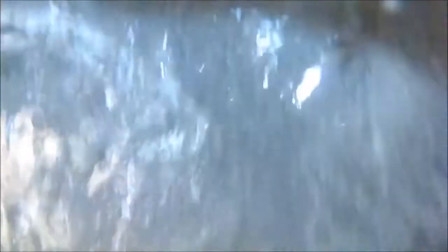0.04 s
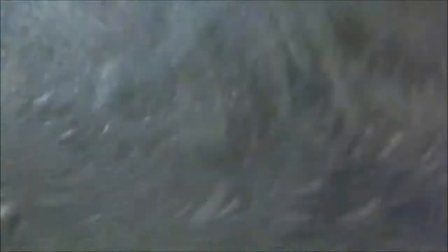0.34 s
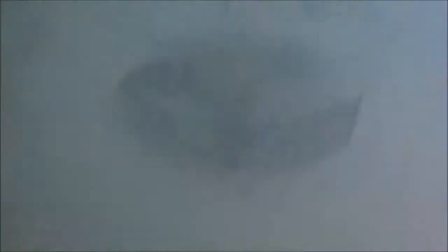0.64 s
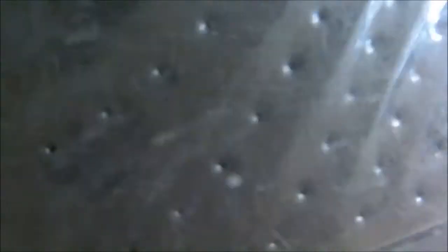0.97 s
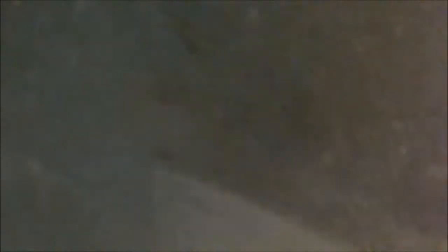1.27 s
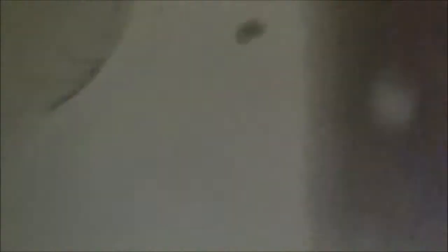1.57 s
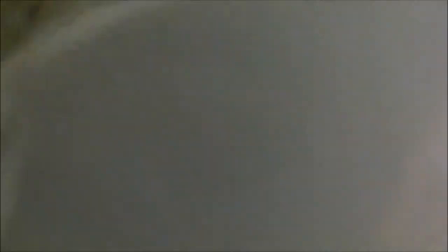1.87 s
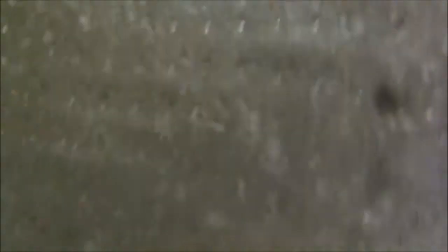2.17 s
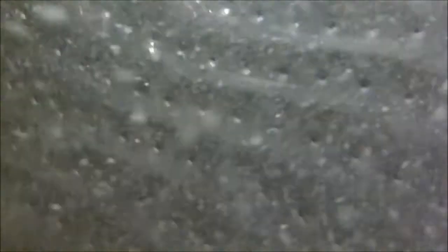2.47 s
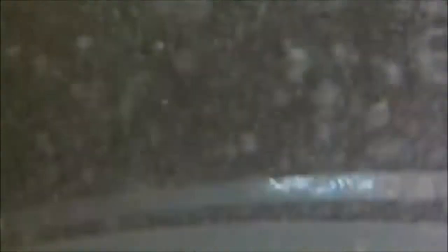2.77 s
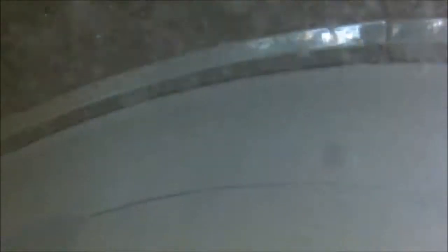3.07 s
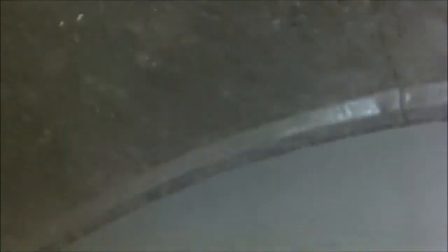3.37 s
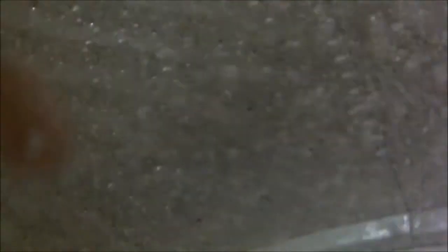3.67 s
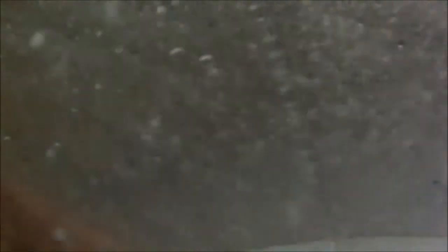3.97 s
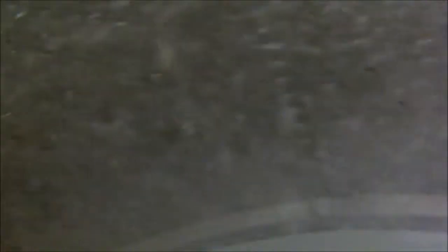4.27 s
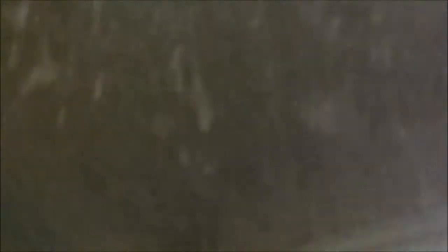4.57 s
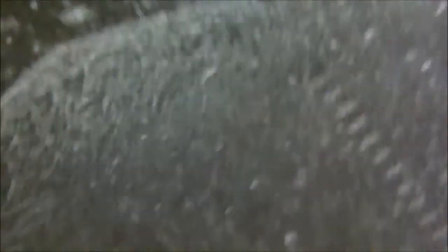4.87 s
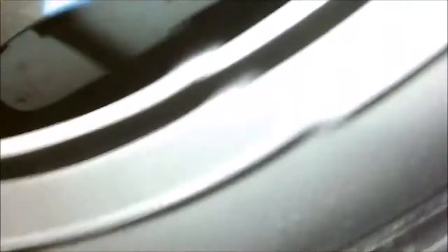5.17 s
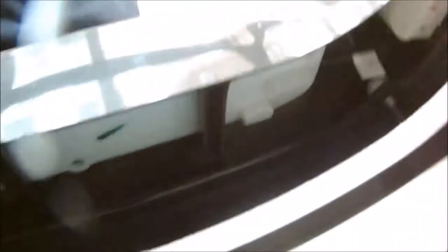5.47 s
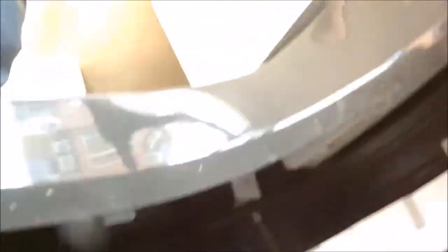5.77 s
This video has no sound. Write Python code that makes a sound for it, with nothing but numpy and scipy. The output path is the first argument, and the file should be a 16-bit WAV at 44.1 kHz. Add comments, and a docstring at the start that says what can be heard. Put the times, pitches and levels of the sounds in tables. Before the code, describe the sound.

Water churns, bubbles and slaps close up in a washing machine over a motor hum, then fades to faint hiss with one knock and trickling.

```python
"""Water churning in the tub of a washing machine, heard from inside a small waterproof camera dipped in it.
Bubbles froth and plop right at the microphone, and waves slap the case hard enough to overload it,
over the hum of the motor. The case sinks, the churning dies away and a faint hiss is left.
Under water the case is rubbed and knocked once; then it comes up with water trickling off it."""
import sys
import numpy as np
from scipy import signal
from scipy.fft import rfft, irfft, next_fast_len
from scipy.io import wavfile
from scipy.ndimage import uniform_filter1d, minimum_filter1d

SR = 44100
rng = np.random.default_rng(int(sys.argv[2]) if len(sys.argv) > 2 else 0)


def waveform_to_disk(signal):
    """Save audio, clipped to [-1, 1], as 16-bit WAV at the path in sys.argv[1]."""
    frames = np.transpose(np.atleast_2d(signal))
    scaled = np.clip(frames, -1, 1) * 32767
    samples = np.round(scaled).astype(np.int16)
    wavfile.write(sys.argv[1], SR, samples)


N = 256662
T = np.arange(N) / SR
DIVE_S, SURFACE_S = 0.95, 4.89  # the case goes under, and comes up again


# How hard the water churns around the microphone: time_s, level_db
CHURN_LEVELS = [(0.0, -26.5), (0.262, -22.5), (0.398, -24.5), (0.544, -18.5), (1.076, -31.5), (1.432, -29),
                (1.564, -34), (1.75, -46.5)]
def churn_db(t, calm_db_per_s=107):
    """Level of the churning, which dies away after its last surge."""
    times, levels = np.transpose(CHURN_LEVELS)
    return np.interp(t, times, levels) - calm_db_per_s * np.maximum(t - times[-1], 0)


def churn():
    """The tub stirs up water and air; depth muffles all but the froth."""
    surge, sunk = undb(2.8 * wander(110)), depth(T)
    water = froth(surge) + slosh(sunk) + spray(surge, sunk) + rumble(sunk)
    return undb(churn_db(T)) * water


# Froth right against the case: frequency_hz, gain_db
FROTH_SPECTRUM = [(530, -39), (900, -3.5), (1140, -20.5), (1310, 0), (1540, -4.5), (1810, -1.5), (2010, 7),
                  (2460, -12), (2920, -16), (3750, -33), (4390, -33), (5000, -49), (6500, -79),
                  (11000, -120)]
def froth(surge, gain_db=1):
    """Small bubbles ring and burst in quick surges."""
    bubbles = fizz(1150, 2800, cycles=19, spread_db=2.5, click_db=-0.5, count=2400) * surge
    return unit(colour(bubbles, FROTH_SPECTRUM)) * undb(gain_db)


# Water sloshing in the tub, close by: frequency_hz, gain_db
SLOSH_SPECTRUM = [(60, -28.5), (210, -19.5), (330, -6.5), (480, -2.5), (680, 5), (820, -12), (1000, -1),
                  (1250, -14), (1700, -58.5)]
def slosh(sunk, gain_db=-6.5, sunk_db=-6):
    """Large bubbles ring low in a wash of noise."""
    water = bubble_cloud(350, 1000, cycles=22, spread_db=3, count=700) + 2.6 * rng.standard_normal(N)
    return unit(colour(water, SLOSH_SPECTRUM)) * undb(gain_db + sunk_db * sunk)


# Spray at the surface of the tub: frequency_hz, gain_db
SPRAY_SPECTRUM = [(1800, -20.5), (2900, 4.5), (3600, -2.5), (4500, -16), (6000, -44.5), (8000, -67.5),
                  (11000, -63.5), (15000, -77)]
def spray(surge, sunk, gain_db=-7, sunk_db=-27.5):
    """The finest bubbles fizz brightly, surging with the froth."""
    bubbles = fizz(2600, 4700, cycles=15, spread_db=7, click_db=4.5, count=1500) * surge
    return unit(colour(bubbles, SPRAY_SPECTRUM)) * undb(gain_db + sunk_db * sunk)


# The tub all around the microphone: frequency_hz, gain_db
TUB_SPECTRUM = [(25, -11), (70, -6), (160, 2), (300, -0.5), (450, -11.5), (900, -53.5)]
def rumble(sunk, gain_db=-18, sunk_db=-27.5):
    """The low noise of the tub fades as the case sinks."""
    return unit(colour(rng.standard_normal(N), TUB_SPECTRUM)) * undb(gain_db + sunk_db * sunk)


# Waves breaking directly on the case: start_s, length_s, level_db, pocket_hz, pocket_db
WAVE_SLAPS = [(0.003, .007, -9, 563, -20), (0.227, 0.010, 0, 490, -12.5), (0.355, 0.054, -17, 494, -36.5),
              (0.388, 0.056, -12, 516, -28), (0.507, 0.062, -1, 532.6, -10.5),
              (0.7445, 0.0056, -8, 536, -31.5), (1.365, 0.011, -3.5, 534.4, -8),
              (1.461, 0.016, -4.5, 538.5, -10)]
# A slap heard from inside the case: frequency_hz, gain_db
SLAP_SPECTRUM = [(15, -51), (25, -22.5), (284, -18), (606, -8), (980, -10.5), (1350, -2), (1660, -4.5),
                 (2000, 4), (2450, -7.5), (3020, -6), (4660, -30.5), (6000, -46.5), (7800, -71),
                 (13200, -120)]
def slaps(attack_s=0.0008, tail_s=0.0065, pocket_t60_s=0.17):
    """A wave breaks as a dense burst of impacts; the air pocket that it traps rings on."""
    out, t = np.zeros(N), T[:int(.3 * SR)]
    impacts = unit(colour(clicks(5000, spread_db=2.5), SLAP_SPECTRUM))
    for start, length, db, pocket_hz, pocket_db in WAVE_SLAPS:
        envelope = np.minimum(t / attack_s, 1) * np.exp(-np.maximum(t - length, 0) / tail_s)
        i = int(start * SR)
        add(out, start, undb(db) * envelope * impacts[i:i + len(t)])
        add(out, start + length, undb(pocket_db) * ring(pocket_hz, pocket_t60_s))
    return out


# The loudest bubbles, bursting beside the case: start_s, level_db, pitch_hz
CLOSE_PLOPS = [(.028, -5, 2064), (.105, -14, 636), (.217, -11, 2190), (.3165, -4, 1948), (.371, -1.5, 1946),
               (.677, -9.5, 1820), (.742, -6.5, 1405), (.767, -7.5, 2070), (.787, -12, 1837),
               (.824, -15.5, 699), (.834, -16, 880), (.888, -14, 617), (.9215, -12, 2180),
               (.9694, -10, 2008), (1.091, -11, 1657), (1.091, -18, 926), (1.158, -18, 1411),
               (1.248, -25, 695), (1.328, -13, 1620), (1.38, -8.5, 1520), (1.426, -16.5, 1810),
               (1.5262, -13, 1480), (1.537, -18, 1150), (1.552, -15.5, 1307), (1.615, -19, 1010),
               (1.661, -18, 2117), (1.692, -24, 1345), (1.750, -19, 2035), (1.938, -34, 1900),
               (1.962, -39, 1970)]
def plops(cycles=61, swell_s=0.0014, shed_db=-10, band_hz=(280, 4000)):
    """Each bubble ticks on the case, rings and sheds weaker ones; all of them are kept within a band, with
    little deep low end or top treble."""
    out = np.zeros(N)
    for start, db, hz in [*CLOSE_PLOPS, *stray_plops()]:
        t60 = cycles / hz  # large bubbles last longer
        bubble = ring(hz, t60, glide=0.13)
        bubble *= 1 - np.exp(-T[:len(bubble)] / swell_s)
        tick_gain = undb(-7.5 - 8.5 * depth(start))
        gain = undb(db) / np.hypot(1, tick_gain)
        add(out, start, gain * bubble / np.abs(bubble).max())
        add(out, start, gain * tick_gain * tick())
        for lag, detune in rng.random((4, 2)):
            shed_hz = hz * (.7 + .25 * detune + .41 * lag)  # the later, the smaller and higher
            add(out, start + .3 * t60 * lag, gain * undb(shed_db) * ring(shed_hz, .6 * t60))
    return signal.sosfilt(signal.butter(6, band_hz, "bandpass", fs=SR, output="sos"), out)


def stray_plops(low_hz=1250, high_hz=2250, over_db=5, scatter_db=3, count=22):
    """Lesser bubbles come at random and follow the level of the churning: start_s, level_db, pitch_hz."""
    when, size, pitch = rng.random((count, 3)).T
    start = (np.arange(count) + when) / count * CHURN_LEVELS[-1][0]
    db = churn_db(start) + over_db + scatter_db * (2 * size - 1)
    return np.column_stack([start, db, low_hz * (high_hz / low_hz) ** pitch])


# Spits of spray reaching the sinking case: start_s, level_db
SPRAY_SPITS = [(1.003, -36), (1.041, -31), (1.063, -25.5), (1.23, -30.5), (1.262, -35)]
# One spit at close range: frequency_hz, gain_db
SPIT_SPECTRUM = [(1000, -59), (2300, -9), (2800, 7.5), (3600, 1.5), (4200, -11.5), (5000, -45), (7000, -65)]
def spits():
    """Spray hits the case in brief, bright bursts."""
    return puffs(SPRAY_SPITS, SPIT_SPECTRUM, swell_s=0.0026)


# A knock on the case, under water: start_s, peak_db
CASE_KNOCKS = [(4.1918, -9.5)]
# The knocked case ringing around the microphone: pitch_hz, gain_db, t60_s
CASE_MODES = [(440, -2.5, 0.072), (556, -2, 0.034), (722, 0.5, 0.046), (950, -1.5, 0.014),
              (1257, -7, 0.028), (1920, 2.5, 0.0092), (3000, -3, 0.0052), (180, -24, 0.0041)]
def knocks(crack_db=-1):
    """A hard contact cracks and rings the modes of the case."""
    out = np.zeros(N)
    for start, db in CASE_KNOCKS:
        blow = np.zeros(N)
        add(blow, start, undb(crack_db) * tick(tilt_db=13))
        for k, (hz, mode_db, t60) in enumerate(CASE_MODES):
            add(blow, start, (-1) ** k * undb(mode_db) * ring(hz, t60))
        out += undb(db) * blow / np.abs(blow).max()
    return out


# Drops and grit touching the case: start_s, peak_db
CASE_TICKS = [(2.352, -43), (2.382, -34), (3.207, -40.5), (3.304, -35.5), (3.335, -33.5), (3.352, -30.5),
              (3.403, -29.5), (3.449, -26.5), (4.912, -37), (4.966, -13.5), (4.996, -29), (5.084, -32),
              (5.115, -25), (5.269, -27.5), (5.739, -30.5)]
def ticks(wet_tilt_db=-4.5, dry_tilt_db=4.5):
    """Small impacts that leave no bubble: dull under water, bright in the air."""
    out = np.zeros(N)
    for start, db in CASE_TICKS:
        add(out, start, undb(db) * tick(wet_tilt_db if start < SURFACE_S else dry_tilt_db))
    return out


def tick(tilt_db=0, decay_s=0.002):
    """A brief patter heard through the case, peak 1."""
    t = T[:int(.08 * SR)]
    patter = through_case(rng.standard_normal(len(t)) * np.exp(-t / decay_s), tilt_db)
    return patter / np.abs(patter).max()


# The plastic case and the air in it, around the microphone: centre_hz, width_hz, gain_db
CASE_RESONANCES = [(628.4, 160, -11), (1460, 160, 3), (1970, 74, 13.5), (2830, 1400, -10)]
def through_case(x, tilt_db=0, top_hz=3500):
    """Ring the resonances of the case, tilted by dB per octave; its wall shuts out the treble."""
    rung = np.zeros(len(x))
    for k, (hz, width, db) in enumerate(CASE_RESONANCES):
        gain = (-1) ** k * undb(db + tilt_db * np.log2(hz / 2000))
        rung += gain * signal.lfilter(*signal.iirpeak(hz, hz / width, fs=SR), x)
    return signal.sosfilt(signal.butter(6, top_hz, fs=SR, output="sos"), rung)


# Drops landing right on the microphone port as it surfaces: start_s, level_db
PORT_DROPS = [(4.957, -28.5), (5.084, -38)]
# One drop on the port: frequency_hz, gain_db
DROP_SPECTRUM = [(500, -19.5), (2000, 7.5), (4000, 5), (7000, -45), (10500, -12), (15000, -26)]
def spatter():
    """Each drop lands as a sharp burst of noise."""
    return puffs(PORT_DROPS, DROP_SPECTRUM, swell_s=0.00075)


# Water trickling off the case, just above the tub: frequency_hz, gain_db
TRICKLE_SPECTRUM = [(200, -45.5), (700, -39.5), (1100, -12.5), (1430, -8), (1720, -8), (1910, 0.5),
                    (2330, -12.5), (3200, -9), (4300, -23), (6000, -43), (8000, -52), (11000, -35),
                    (15000, -54.5)]
def runoff(level_db=-45, rise_s=0.11, fall_db_per_s=6):
    """Water fizzes and patters on the surfacing case; the flow starts fast and thins out."""
    age = np.maximum(T - SURFACE_S, 0)
    flow = np.minimum(age / rise_s, 1) * undb(level_db - fall_db_per_s * age)
    spurts = undb(3 * wander(110))
    drips = spurts * fizz(1200, 4500, cycles=22, spread_db=4.5, click_db=6, count=2200)
    return unit(colour(drips, TRICKLE_SPECTRUM)) * flow


# One gulp of water draining off the case: start_s, length_s, level_db
DRAIN_GULP = (5.55, 0.084, -35)
def gulp():
    """A short swell of larger bubbles and noise rings the case."""
    start, length, db = DRAIN_GULP
    water = bubble_cloud(900, 1800, cycles=40, spread_db=2.5, count=1800) + 1.6 * rng.standard_normal(N)
    return undb(db) * np.sqrt(np.abs(arch(start, length))) * unit(through_case(water))


# Rubs on the submerged case: start_s, length_s, level_db, low_end_db
CASE_RUBS = [(2.296, 0.029, -52.5, 23), (3.891, 0.03, -46, -0.5), (3.999, 0.033, -47.5, 15),
             (4.033, 0.12, -41.5, 2), (4.302, 0.082, -46, 27), (4.649, 0.14, -41, -25.5)]
# Friction heard from inside the case: frequency_hz, gain_db
RUB_SPECTRUM = [(18, -53), (30, -23), (294, -23), (469, -6.5), (816, -11), (974, -6), (1140, -24),
                (1390, -3), (1590, -11), (1850, 3), (2360, -18.5), (2820, -9), (3940, -29), (6000, -57),
                (7800, -76), (13200, -120)]
def rubs(low_hz=900):
    """Short swells of fine stick-slip friction; a softer grip gives more low end."""
    slips = unit(colour(clicks(6000, spread_db=3.5), RUB_SPECTRUM))
    low_end = signal.sosfilt(signal.butter(1, low_hz, fs=SR, output="sos"), slips)
    out = np.zeros(N)
    for start, length, db, low_db in CASE_RUBS:
        out += undb(db) * arch(start, length) * unit(slips + (undb(low_db) - 1) * low_end)
    return out


# Nudges of the case, deep in the tub: start_s, level_db
CASE_NUDGES = [(2.06, -57.5), (2.31, -70), (2.75, -69.5)]
# A nudge heard from inside the case: frequency_hz, gain_db
NUDGE_SPECTRUM = [(20, 0), (70, -15), (150, -5), (260, -16), (600, -7), (1200, -42)]
def nudges():
    """Soft contacts give faint, dull thuds."""
    return puffs(CASE_NUDGES, NUDGE_SPECTRUM, swell_s=0.011)


# The motor, behind the water: pitch_hz, start_s, end_s, level_db
MOTOR_TONES = [(119, .08, .72, -44), (258, .15, .7, -47), (178, .88, 1.45, -57), (199, 1.85, 3.0, -84)]
def motor_hum(fade_s=0.08):
    """Motor tones come and go as the case moves through the tub."""
    out = np.zeros(N)
    pitch_wobble, level_waver = 1 + .004 * wander(8), undb(1.6 * wander(9))
    for hz, start, end, db in MOTOR_TONES:
        gate = np.clip(np.minimum(T - start, end - T) / fade_s + .5, 0, 1)
        out += np.sqrt(2) * undb(db) * gate * np.sin(2 * np.pi * hz * np.cumsum(pitch_wobble) / SR)
    return out * level_waver


# The background at the microphone inside the case: frequency_hz, gain_db
HISS_SPECTRUM = [(30, -8.5), (139, -19.5), (240, -22.5), (420, -15), (612, -8), (859, -10.5), (1250, -2.5),
                 (2030, -4), (2840, -4.5), (4200, -18), (6300, -45.5), (8200, -42.5), (11000, -28.5),
                 (15000, -33)]
def hiss(level_db=-59, case_hz=1950, width_hz=260):
    """Faint steady hiss with the case's main resonance standing out of it."""
    noise = colour(rng.standard_normal(N), HISS_SPECTRUM)
    resonance = signal.lfilter(*signal.iirpeak(case_hz, case_hz / width_hz, fs=SR), noise)
    return unit(noise + resonance) * undb(level_db + .5 * wander(14))


def depth(t, sink_s=0.13):
    """How far the case has sunk in its dive: 0 at the surface, 1 deep in the tub."""
    return 1 - np.exp(-np.maximum(t - DIVE_S, 0) / sink_s)


def fizz(low_hz, high_hz, cycles, spread_db, click_db, count):
    """A cloud of bubbles among the wide-band clicks of their bursting."""
    bursts = clicks(1800, spread_db=4)
    return bubble_cloud(low_hz, high_hz, cycles, spread_db, count) + undb(click_db) * bursts


def bubble_cloud(low_hz, high_hz, cycles, spread_db, count):
    """Bubbles of random size, each ringing for some cycles and gliding up."""
    out = np.zeros(N)
    for when, pitch, faintness, life in rng.random((count, 4)):
        hz = low_hz * (high_hz / low_hz) ** pitch
        gain = undb(-spread_db * np.log(.04 + faintness))
        add(out, when * N / SR, gain * ring(hz, cycles * (.5 + life) / hz, glide=.15))
    return unit(out)


def ring(hz, t60, glide=0):
    """A dying sine whose pitch rises by the share `glide` as it fades."""
    t = T[:int(max(t60, .002) * SR)]
    return np.sin(2 * np.pi * hz * t * (1 + glide * t / (2 * t60))) * np.exp(-np.log(1000) * t / t60)


def clicks(per_s, spread_db):
    """Random tiny impacts, a few much larger than the rest."""
    hits = rng.random(N) < per_s / SR
    size = np.minimum(rng.exponential(size=N), 3.5)
    return unit(hits * rng.choice([-1, 1], N) * undb(spread_db * size))


def puffs(rows, spectrum, swell_s):
    """Bursts of coloured noise that swell and fade, one for each row of start_s, level_db."""
    out, age = np.zeros(N), T[:int(.15 * SR)] / swell_s
    for start, db in rows:
        noise = unit(colour(rng.standard_normal(len(age)), spectrum))
        add(out, start, undb(db) * age * np.exp(1 - age) * noise)
    return out


def colour(x, spectrum):
    """Minimum-phase filter that follows rows of frequency_hz, gain_db."""
    size = next_fast_len(len(x) + 4096)
    hz, db = np.transpose(spectrum)
    bins_hz = np.maximum(np.arange(size // 2 + 1) * SR / size, 1)
    gain = undb(np.interp(np.log(bins_hz), np.log(hz), db))
    cepstrum = irfft(np.log(gain), size)
    cepstrum[1:size // 2] *= 2
    cepstrum[size // 2 + 1:] = 0
    return irfft(rfft(x, size) * np.exp(rfft(cepstrum)), size)[:len(x)]


def wander(rate_hz):
    """Smooth random drift, rms 1."""
    hold = max(int(SR / rate_hz), 1)
    steps = np.repeat(rng.standard_normal(N // hold + 1), hold)
    return unit(uniform_filter1d(uniform_filter1d(steps, hold), hold)[:N])


def arch(start_s, length_s):
    """A half-sine swell."""
    return np.sin(np.pi * np.clip((T - start_s) / length_s, 0, 1))


def undb(db):
    """Decibels to gain."""
    return 10 ** (np.asarray(db) / 20)


def unit(x):
    """Scale to rms 1."""
    return x / np.sqrt(np.mean(x ** 2))


def add(out, start_s, sound):
    """Mix a sound in at a time."""
    i = max(int(start_s * SR), 0)
    out[i:i + len(sound)] += sound[:N - i]


def scene():
    """Everything reaches one microphone inside the case."""
    water = churn() + slaps() + plops() + spits() + spatter()
    contacts = nudges() + ticks() + knocks() + rubs()
    return (water + contacts + runoff() + gulp() + motor_hum() + hiss())[None]


# Crackle of the overloaded camera: frequency_hz, gain_db
CRACKLE_SPECTRUM = [(4000, -35.5), (6500, -20), (8000, -18), (10500, -2), (15000, 1)]
def record(dry, ceiling=0.89, hold_s=0.0008, overload=0.72, top_hz=15500):
    """A very fast limiter flattens the slaps, the highest crests crackle, and the top is cut."""
    hold = int(hold_s * SR)
    gain = np.minimum(1, ceiling / (np.abs(dry) + 1e-9))
    limited = dry * uniform_filter1d(minimum_filter1d(gain, hold), hold)
    crests = limited - np.clip(limited, -overload, overload)
    crackling = limited - colour(crests[0], CRACKLE_SPECTRUM)
    return signal.sosfilt(signal.ellip(8, .2, 70, top_hz, fs=SR, output="sos"), crackling)


dry = scene()
out = record(dry)
waveform_to_disk(out)
```